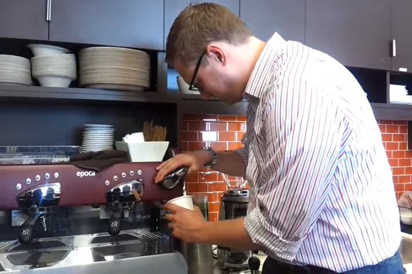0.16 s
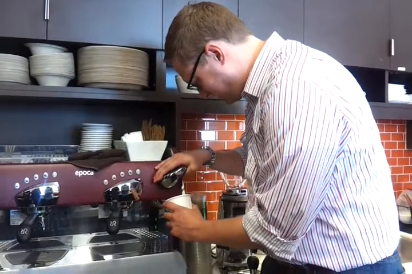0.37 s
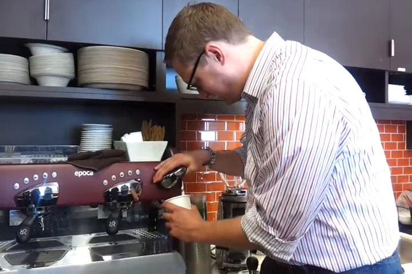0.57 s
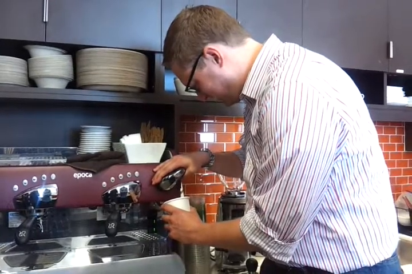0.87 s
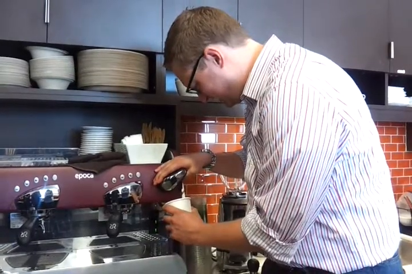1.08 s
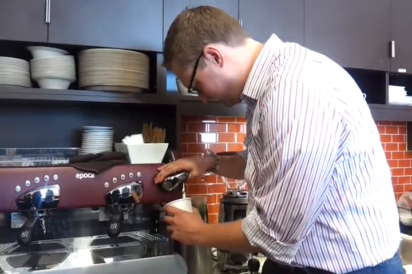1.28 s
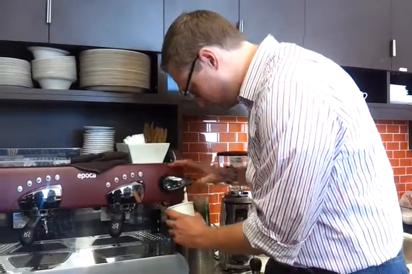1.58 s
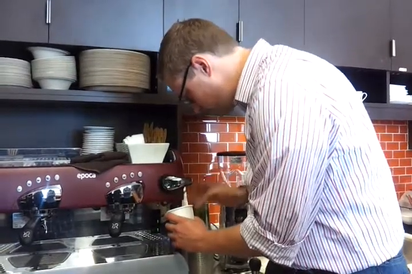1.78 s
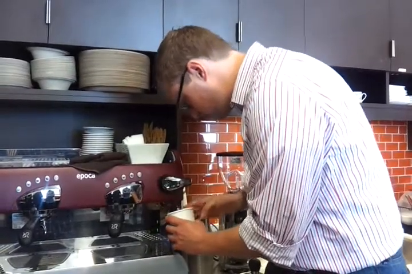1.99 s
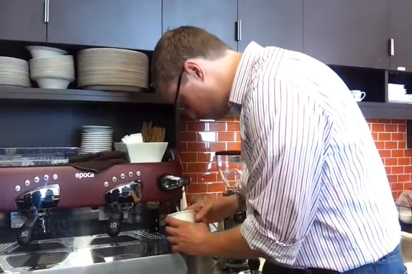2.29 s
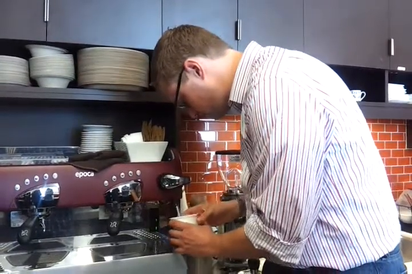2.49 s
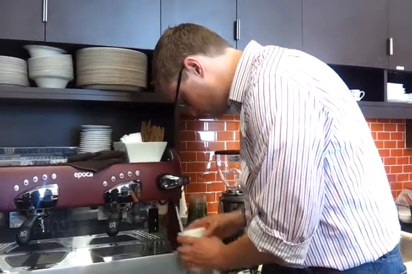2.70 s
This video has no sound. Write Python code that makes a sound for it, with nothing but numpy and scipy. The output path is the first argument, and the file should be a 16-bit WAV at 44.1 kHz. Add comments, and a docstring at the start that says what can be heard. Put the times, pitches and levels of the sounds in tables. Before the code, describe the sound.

A steam wand hisses loudly into a cup of milk, screeching hoarsely at first, then churning and gurgling. It shuts off, and a few light metallic taps follow close by over a machine hum in a small cafe.

```python
"""A steam wand hisses into a cup of milk, with a hoarse screech while its tip is near the surface.
As the tip sinks, collapsing bubbles ring the steam pocket: a hollow churn with gurgles and fizzing foam.
The valve closes, the jet's resonance slides down, and the hiss dulls and dies as the foam settles.
A few light taps ring the wand in the small room, over the steady hum of a cafe's machines."""
import sys
import numpy as np
from scipy import signal
from scipy.fft import rfft, irfft, next_fast_len
from scipy.io import wavfile

SR = 44100
rng = np.random.default_rng(int(sys.argv[2]) if len(sys.argv) > 2 else 0)


def wav_record(signal):
    """Record a signal, one row per channel, as 16-bit PCM in the file named by sys.argv[1]."""
    frames = np.transpose(np.atleast_2d(signal))
    bounded = np.clip(frames, -1, 1)
    # unit amplitude maps onto the largest positive 16-bit level
    quanta = np.round(bounded * 32767).astype(np.int16)
    wavfile.write(sys.argv[1], SR, quanta)


N = 125685
T = np.arange(N) / SR
ROOM_T60_S = .29


def from_db(db):
    """Decibels to gain."""
    return 10 ** (np.asarray(db) / 20)


def rms_one(x):
    """Scale to unit power."""
    return x / np.sqrt(np.mean(x ** 2) + 1e-20)


def in_time(rows):
    """Turn breakpoints (time first) into one envelope per remaining column."""
    times, *columns = np.transpose(rows)
    return [np.interp(T, times, column) for column in columns]


def butter(order, hz, kind="low"):
    """Butterworth filter sections."""
    return signal.butter(order, hz, kind, fs=SR, output="sos")


def drift(rate_hz):
    """Smooth random modulation with a spread of about 1."""
    hop, run_in = 40, 2000
    pole = np.exp(-2 * np.pi * rate_hz * hop / SR)
    noise = rng.standard_normal(N // hop + run_in + 2)
    slow = signal.lfilter([1], [1, -2 * pole, pole * pole], noise)[run_in:]
    return np.interp(np.arange(N) / hop, np.arange(len(slow)), rms_one(slow))


def colour(x, spectrum):
    """Shape a signal with an EQ curve; unit power."""
    hz, db = np.transpose(spectrum)
    size = next_fast_len(N)
    bins_hz = np.maximum(np.fft.rfftfreq(size, 1 / SR), 1)
    gain = from_db(np.interp(np.log(bins_hz), np.log(hz), db))
    return rms_one(irfft(rfft(x, size) * gain, size)[:N])


def resonate(x, hz, width_hz):
    """Ring one resonance; unit power."""
    radius = np.exp(-np.pi * width_hz / SR)
    feedback = [1, -2 * radius * np.cos(2 * np.pi * hz / SR), radius * radius]
    return rms_one(signal.lfilter([1, 0, -1], feedback, x + 1e-18))


def collapses(per_s, spread_db):
    """Random clicks of collapsing bubbles, uneven in size; unit power."""
    sizes = from_db(spread_db * np.minimum(rng.exponential(1, N), 4)) * rng.choice([-1, 1], N)
    return rms_one(sizes * (rng.random(N) < per_s / SR))


def gliding(hz, width_hz):
    """Turbulence in a narrow band whose centre moves; unit power."""
    noise_a, noise_b = signal.sosfilt(butter(2, width_hz / 2), rng.standard_normal((2, N)))
    phase = 2 * np.pi * np.cumsum(hz) / SR
    return rms_one(noise_a * np.cos(phase) + noise_b * np.sin(phase))


def dying(after_s):
    """Gain that holds, then releases at the room's decay rate."""
    return from_db(-60 * np.maximum(T - after_s, 0) / ROOM_T60_S)


def steam(hiss_db=-5, cup_db=-7, treble_hz=3880, treble_lift_db=11, shallow_dip_db=-2.5):
    """The jet hisses with turbulence and dense collapses, and its noise rings the cup and wand."""
    # envelope of the jet: (time [s], level [dB], treble gain before the lift [dB])
    jet_envelope = [(0, -12.5, -4), (.1, -16, 0), (.27, -12.5, -4.5), (.4, -11.5, -8.5), (.52, -16, -7.5),
                    (.65, -15.5, -9), (.78, -12, -11), (.87, -15, -8.5), (1.03, -13.5, -9),
                    (1.2, -12.5, -10.5), (1.33, -14, -6.5), (1.38, -11, -7), (1.44, -14.5, -4),
                    (1.52, -13, -24), (1.61, -24.5, -20.5), (1.67, -38.5, -40)]
    # colour of the hiss: (frequency [Hz], relative level [dB])
    hiss_colour = [(300, -25), (600, -16), (950, -3), (1400, -6.5), (2050, -2), (3500, -6.5), (4000, -9),
                   (5400, -9), (6300, -16.5), (7500, -21.5), (9000, -16.5)]
    # resonances of cup and wand: (frequency [Hz], width [Hz], relative level [dB])
    cup_modes = [(1189, 34, -6.5), (1459.4, 17, -6), (1584, 17, -9), (1869, 84, -6), (2073, 23, -4),
                 (2485, 35, -8.5), (2837, 49, -2), (3518, 130, -3.5), (3997, 390, -1), (4227, 146, -5),
                 (4760, 90, -7), (5223, 310, -7.5), (6026, 65, -13)]
    level_db, treble_db = in_time(jet_envelope)
    hiss = colour(rng.standard_normal(N) + .37 * collapses(per_s=2500, spread_db=-1.5), hiss_colour)
    cup = sum(from_db(db) * resonate(rng.standard_normal(N), hz, width) for hz, width, db in cup_modes)
    cup = signal.sosfilt(butter(2, [900, 6200], "band"), rms_one(cup))
    jet = from_db(hiss_db) * hiss + from_db(cup_db) * cup
    body = signal.sosfiltfilt(butter(2, treble_hz), jet)
    treble = (jet - body) * from_db(treble_db + treble_lift_db)
    # until the tip has sunk, the body loses its lows and gives way to the screech
    sunk_s, sinking_s = .59, .18
    shallow = np.clip((sunk_s - T) / sinking_s, 0, 1)
    lows = signal.sosfiltfilt(butter(3, hz=850), body)
    body = (body - shallow * lows) * from_db(shallow_dip_db * shallow + .5 * drift(25))
    return (body + treble) * from_db(level_db + .71 * drift(33)) * dying(jet_envelope[-1][0])


def screech(lower_db=-4.5):
    """Two hoarse resonances glide while the tip is near the surface."""
    # path of the screech: (time [s], lower resonance [Hz], upper resonance [Hz], level [dB])
    glide = [(0, 1589, 3400, -16), (.06, 1532, 3350, -16.5), (.13, 1319, 3100, -15.5),
             (.19, 1340, 3030, -18), (.235, 1427, 3150, -12.5), (.285, 1310, 3130, -17.5),
             (.345, 1718, 3450, -18.5), (.39, 1612, 2873, -21.5), (.46, 1617, 2850, -21),
             (.56, 1185, 2850, -27.5)]
    lower_hz, upper_hz, level_db = in_time(glide)
    pair = from_db(lower_db) * gliding(lower_hz, width_hz=300) + gliding(upper_hz, width_hz=390)
    return pair * from_db(level_db) * dying(glide[-1][0])


def valve_closing():
    """The jet's resonance slides down as the steam is shut off."""
    # falling resonance: (time [s], frequency [Hz], level [dB])
    sweep = [(1.34, 4100, -32.5), (1.38, 3400, -31), (1.425, 2950, -18), (1.475, 1900, -22),
             (1.53, 1300, -30.5), (1.58, 1100, -23), (1.68, 900, -34.5)]
    hz, level_db = in_time(sweep)
    gate = (T > sweep[0][0]) * dying(sweep[-1][0])
    return gliding(hz, width_hz=400) * from_db(level_db) * gate


def churn(trim_db=-.5, wander=.04):
    """Larger collapses ring the steam pocket under the milk; its pitch wanders with its size."""
    # envelope of the churn: (time [s], level before the trim [dB])
    churn_envelope = [(0, -38), (.37, -35.5), (.46, -22.5), (.56, -21.5), (.64, -19.5), (.72, -28),
                      (.85, -20.5), (.95, -23.5), (1.33, -23.5), (1.39, -19.5), (1.5, -26), (1.56, -34),
                      (1.62, -31.5), (1.7, -38), (1.9, -46.5)]
    # resonances of the pocket: (frequency [Hz], width [Hz], relative level [dB])
    pocket_modes = [(590, 220, -9.5), (811, 86, -3.5), (856.4, 72, 1), (986, 60, 0), (1207, 290, -3.5)]
    level_db, = in_time(churn_envelope)
    pops = collapses(per_s=900, spread_db=6)
    rings = sum((-1) ** k * from_db(db) * resonate(pops, hz, width)
                for k, (hz, width, db) in enumerate(pocket_modes))
    rings = signal.sosfilt(butter(2, [650, 1600], "band"), rings)
    speed = 1 + wander * drift(14)   # varispeed bends all the resonances together
    rings = np.interp(np.cumsum(speed) / SR, T, rings)
    return rms_one(rings) * from_db(level_db + trim_db) * dying(churn_envelope[-1][0])


def gurgles(sigma_s=.012, rise_per_s=.54, wobble=.03):
    """Each large bubble swells and fades, its unsteady pitch rising a little."""
    # single bubbles in the milk: (peak time [s], pitch [Hz], peak level [dB])
    bubbles = [(0.594, 1150, -20), (0.641, 906, -12), (.675, 679, -23.5), (0.756, 3800, -18.5),
               (.787, 2020, -21), (.967, 4115, -15), (1.076, 1820, -15.5), (1.074, 3944, -16),
               (1.275, 1410, -16.5), (1.366, 2446, -19), (1.394, 1332, -15), (1.488, 867, -16.5),
               (1.52, 638, -29), (1.6, 572, -30), (1.66, 552, -31)]
    out = np.zeros(N)
    for peak_s, hz, db in bubbles:
        pitch_hz = hz * (1 + rise_per_s * (T - peak_s) + wobble * drift(120))
        swell = np.exp(-.5 * ((T - peak_s) / sigma_s) ** 2)
        out += from_db(db) * swell * np.sin(2 * np.pi * np.cumsum(pitch_hz) / SR)
    return out


def foam(per_s=500, pitches=14, q=11, peak_db=-23.5, peak_s=1.406, fade_db_per_s=54):
    """Small bubbles ring briefly: a fizz that builds under the jet and fades as the foam settles."""
    fizz = sum(resonate(collapses(per_s / pitches, spread_db=3), hz, hz / q)
               for hz in np.geomspace(944, 2190, pitches))
    swell = np.minimum(T / peak_s, 1)
    return rms_one(fizz) * swell * from_db(peak_db - fade_db_per_s * np.maximum(T - peak_s, 0))


def taps(scuff_attack_s=.003, scuff_t60_s=.13):
    """Each touch is a short scuff and a metallic ring of the wand."""
    # light touches: (time [s], level [dB], ring send [dB])
    touches = [(1.773, -33, 4), (1.894, -37.5, -5), (2.014, -59, -14), (2.276, -37.5, -11),
               (2.457, -43, -15), (2.541, -41.5, -4), (2.661, -44, -3)]
    # modes of the wand: (frequency [Hz], relative level [dB], T60 [s])
    wand_modes = [(1997, -21.5, 0.053), (3360, -8, .07), (3820, -7, .06), (4900, 0, 0.043), (5060, -7, .08),
                  (5230, -6, 0.057), (5200, -16, .06)]
    # colour of the scuff: (frequency [Hz], relative level [dB])
    scuff_colour = [(300, 20.5), (1000, 5.5), (2200, 3.5), (3500, 8), (5500, -8), (8000, -28.5)]
    noise = colour(rng.standard_normal(N), scuff_colour)
    out = np.zeros(N)
    for start_s, db, ring_db in touches:
        age = np.maximum(T - start_s, 0)
        scuff = noise * np.minimum(age / scuff_attack_s, 1) * from_db(-60 * age / scuff_t60_s)
        ring = sum(from_db(mode_db - 60 * age / t60) * np.sin(2 * np.pi * hz * age)
                   for hz, mode_db, t60 in wand_modes)
        out += from_db(db) * (scuff + from_db(ring_db) * ring)
    return out


def room(x, wet_db=-6, damping_hz=3550, predelay_s=.004):
    """Dense, slightly dull reflections from tiles and cupboards."""
    tail = rng.standard_normal(N) * dying(0) * (T > predelay_s)
    tail = signal.sosfilt(butter(1, damping_hz), tail)
    wet = signal.fftconvolve(x, tail)[:N]
    return from_db(wet_db) * np.std(x) * rms_one(wet)


def machines(bed_db=-33.5):
    """Machines and ventilation lay down a steady noise bed with a wavering hum."""
    # tones of the hum: (frequency [Hz], RMS level [dB])
    hum_tones = [(118.4, -47), (193.8, -48.5), (468.3, -47.5)]
    # colour of the bed: (frequency [Hz], relative level [dB])
    bed_colour = [(15, -46.5), (25, -21.5), (86, -16), (107, -13.5), (190, -1), (241, -3), (265, -7.5),
                  (345, -2.5), (428, -10.5), (471, -1.5), (518, -9), (556, -7), (706, -12), (1550, -17.5),
                  (2120, -23.5), (5370, -31.5), (7500, -42.5), (9750, -67.5), (16500, -120)]
    hum = np.zeros(N)
    for hz, db in hum_tones:
        amplitude = np.sqrt(2) * from_db(db + 1.1 * drift(7.2))
        hum += amplitude * np.sin(2 * np.pi * hz * T + .26 * drift(4.5))
    bed = colour(rng.standard_normal(N), bed_colour)
    return hum + bed * from_db(bed_db + .5 * drift(5.7))


def scene():
    """Wand, milk and taps in the room, over the machines; mono."""
    near = steam() + screech() + valve_closing() + churn() + gurgles() + foam() + taps()
    return (near + room(near) + machines())[None]


def record(dry):
    """Round off the loudest peaks, roll off the top, clip any overshoot and filter its edge."""
    ceiling, top_hz, stopband_hz = .74, 6940, 16800
    rounded = dry / (1 + (dry / ceiling) ** 10) ** (1 / 10)
    dulled = signal.sosfilt(butter(16, top_hz), rounded)
    clipped = np.clip(dulled, -ceiling, ceiling)
    return signal.sosfilt(signal.cheby2(12, 60, stopband_hz, fs=SR, output="sos"), clipped)


dry = scene()
out = record(dry)
wav_record(out)
```